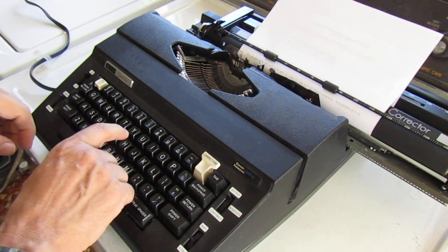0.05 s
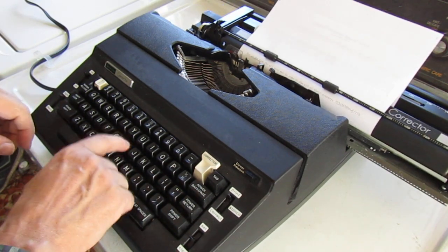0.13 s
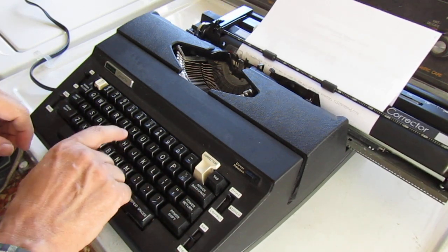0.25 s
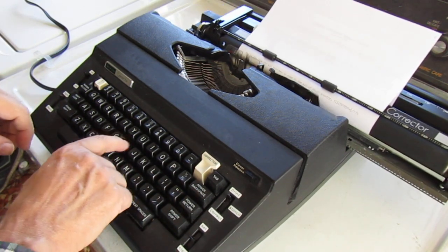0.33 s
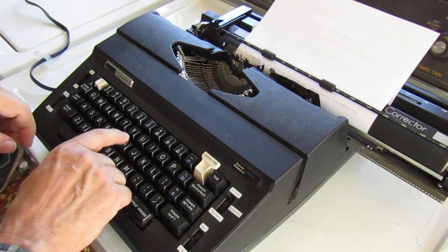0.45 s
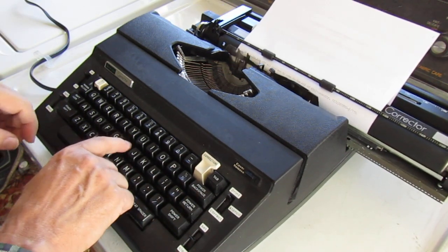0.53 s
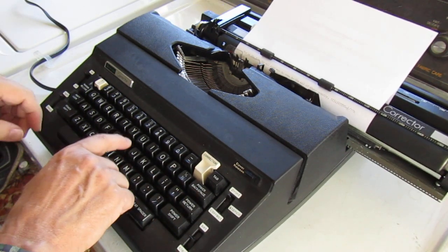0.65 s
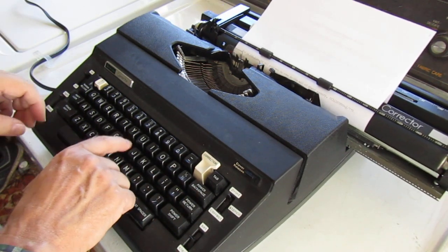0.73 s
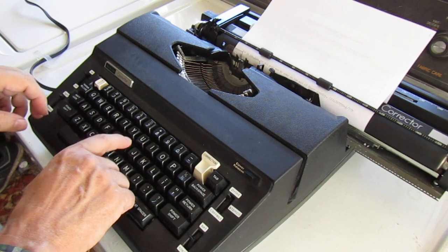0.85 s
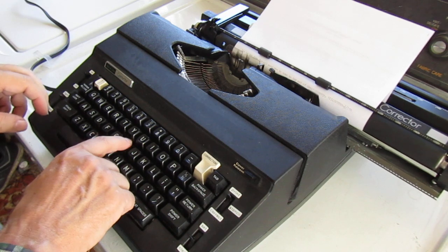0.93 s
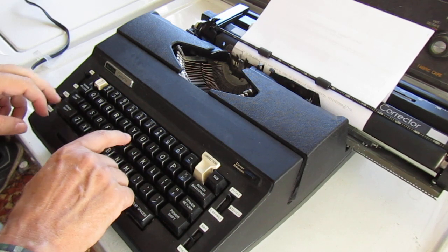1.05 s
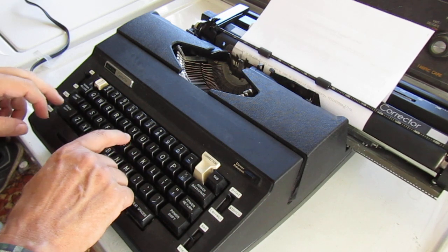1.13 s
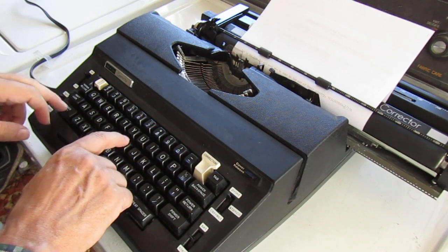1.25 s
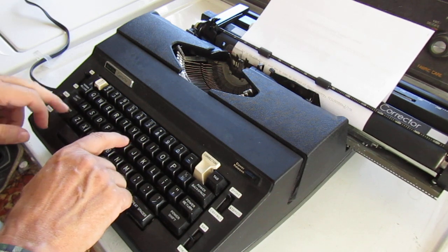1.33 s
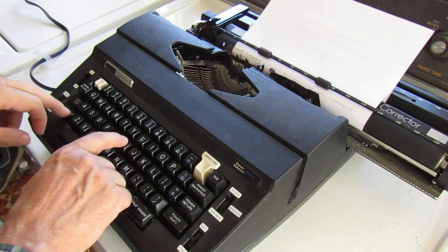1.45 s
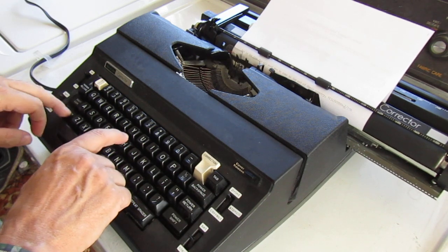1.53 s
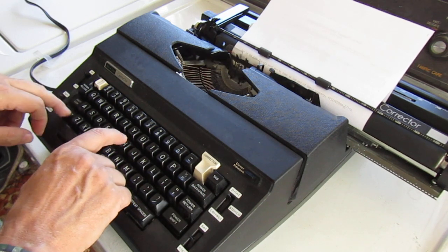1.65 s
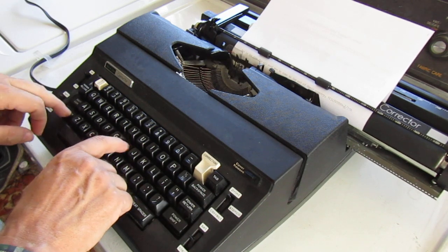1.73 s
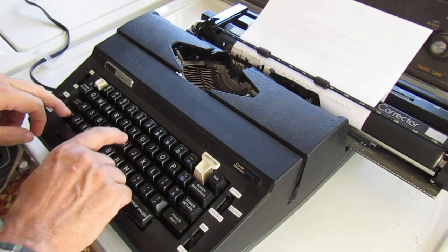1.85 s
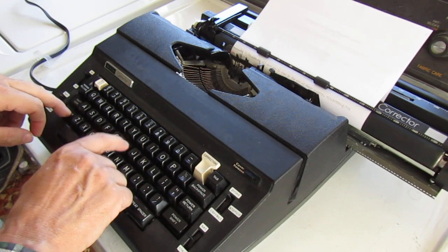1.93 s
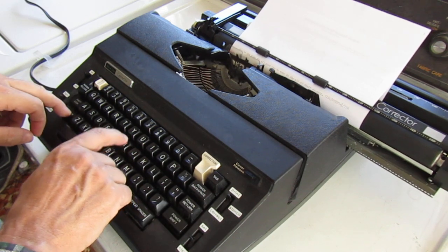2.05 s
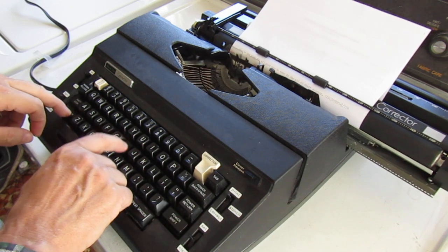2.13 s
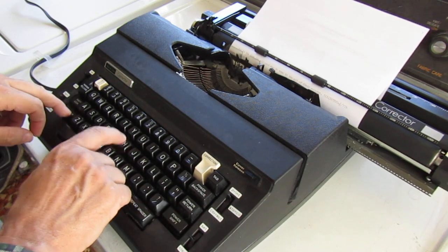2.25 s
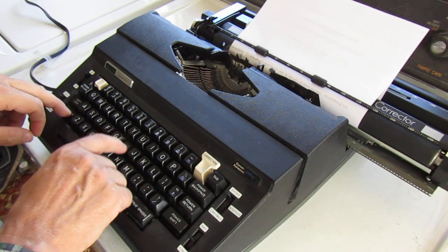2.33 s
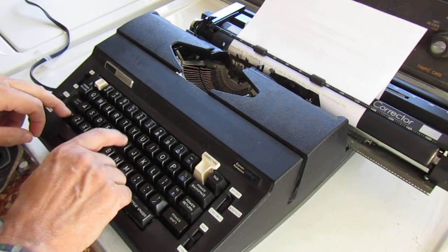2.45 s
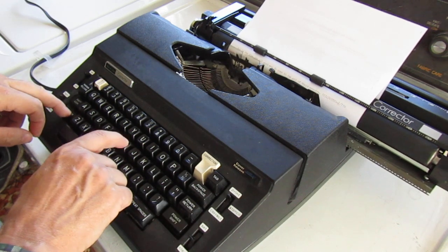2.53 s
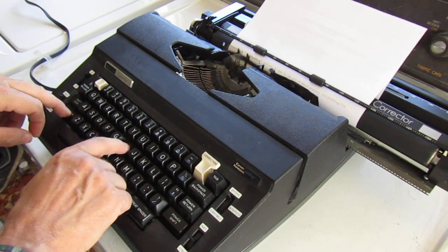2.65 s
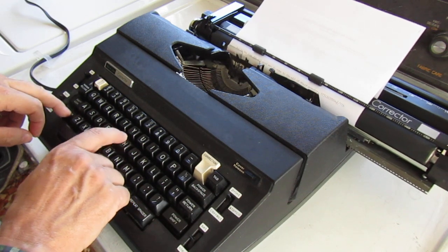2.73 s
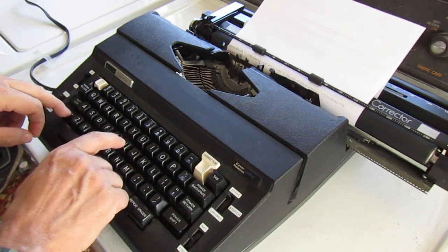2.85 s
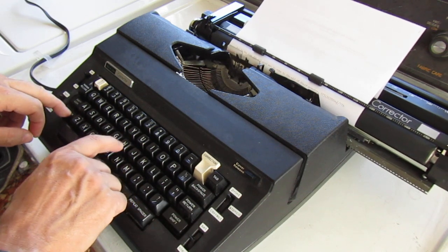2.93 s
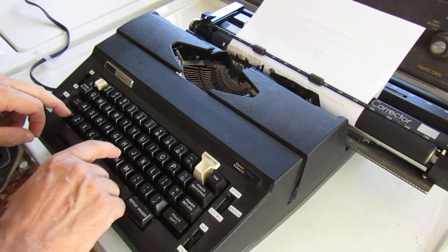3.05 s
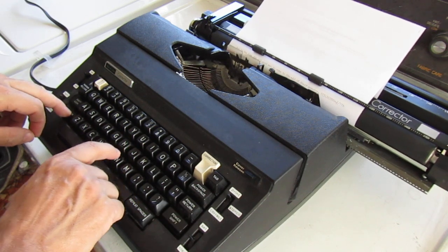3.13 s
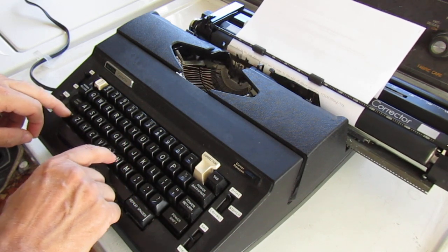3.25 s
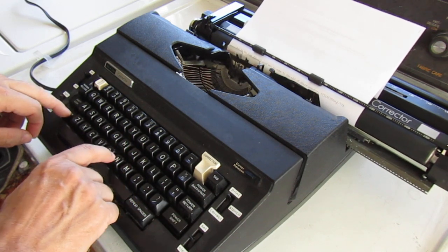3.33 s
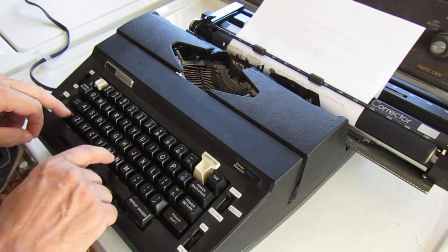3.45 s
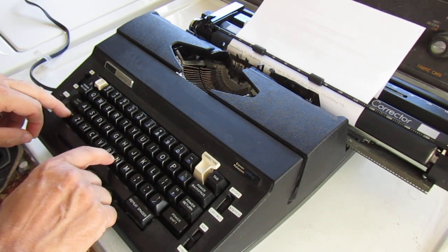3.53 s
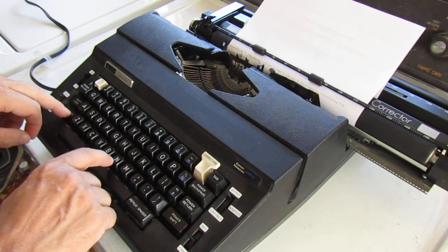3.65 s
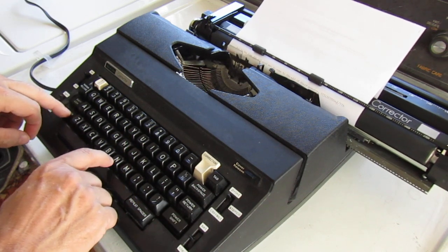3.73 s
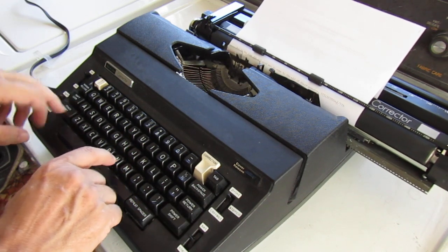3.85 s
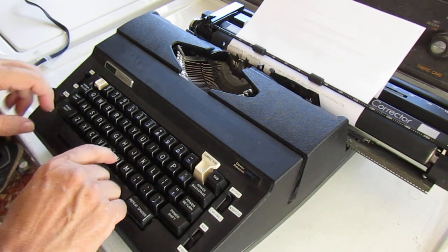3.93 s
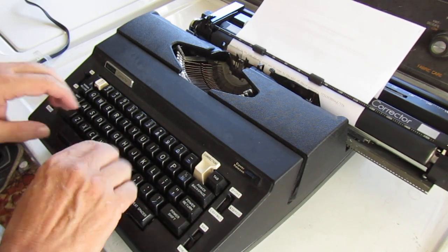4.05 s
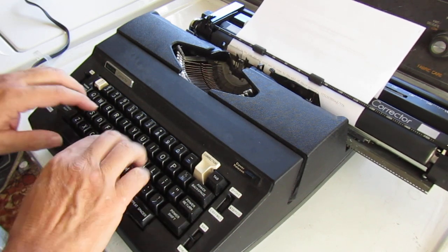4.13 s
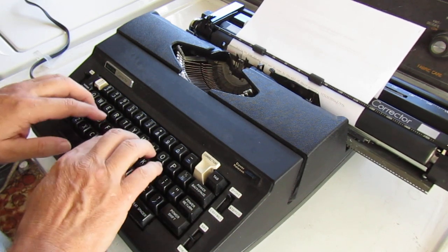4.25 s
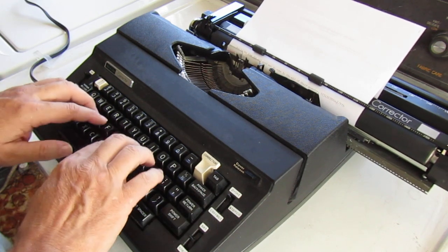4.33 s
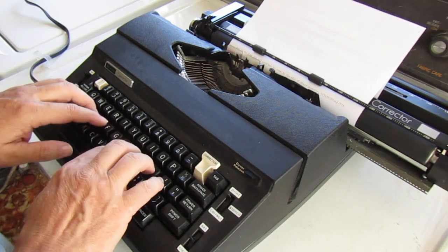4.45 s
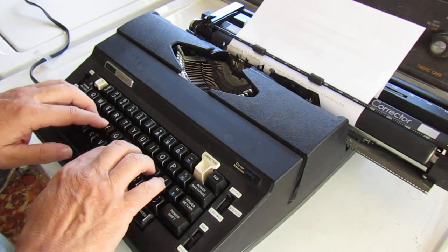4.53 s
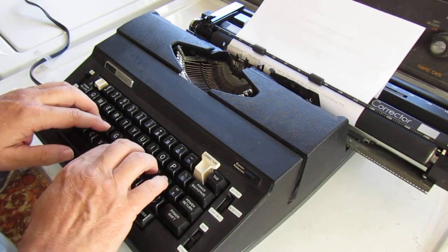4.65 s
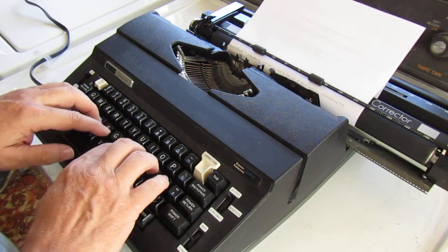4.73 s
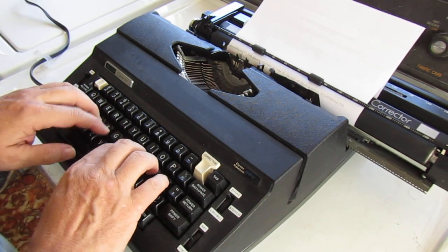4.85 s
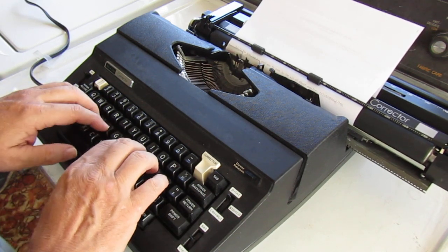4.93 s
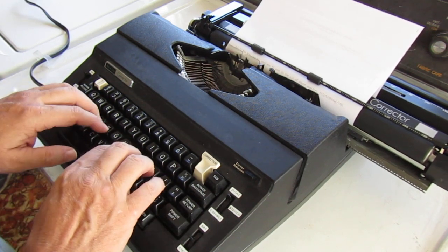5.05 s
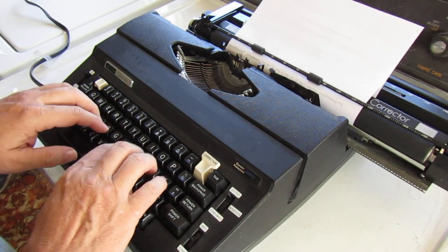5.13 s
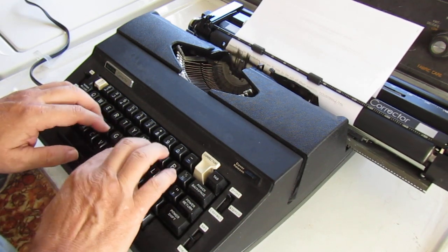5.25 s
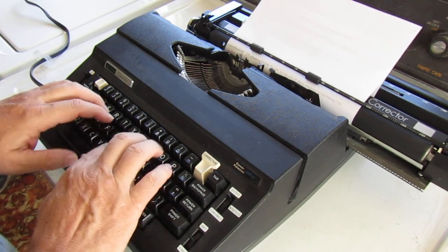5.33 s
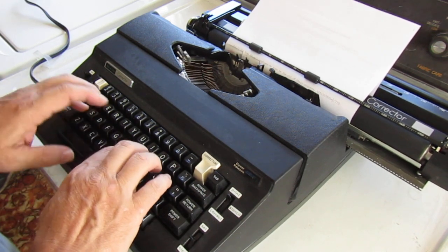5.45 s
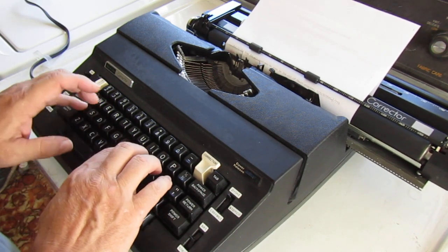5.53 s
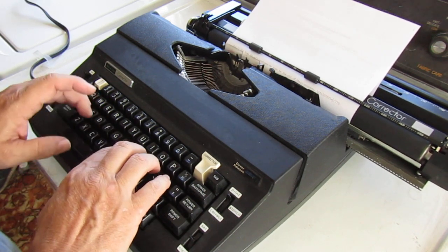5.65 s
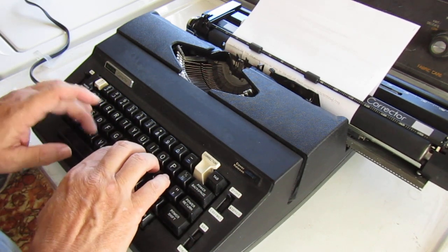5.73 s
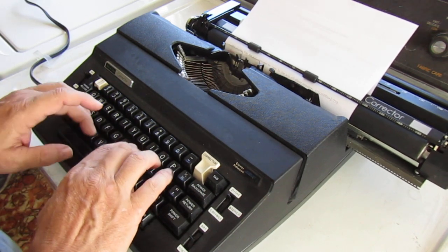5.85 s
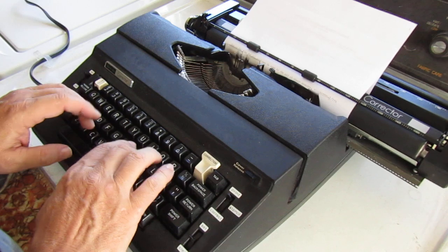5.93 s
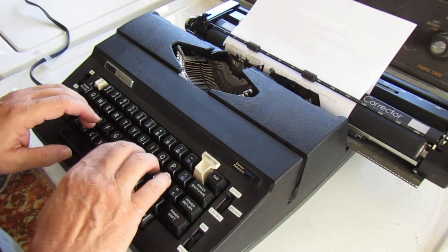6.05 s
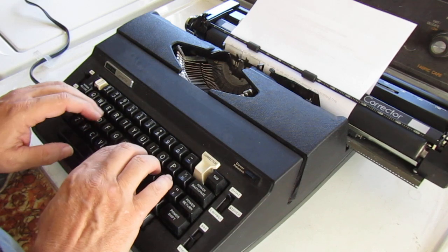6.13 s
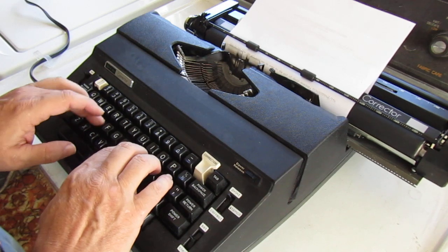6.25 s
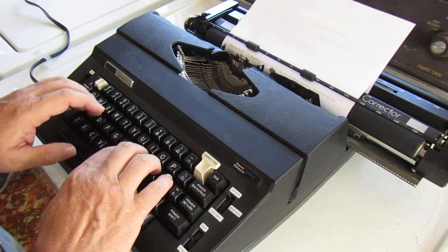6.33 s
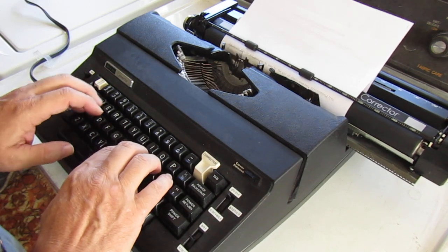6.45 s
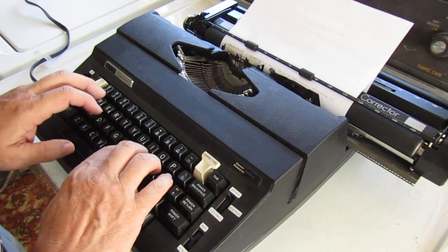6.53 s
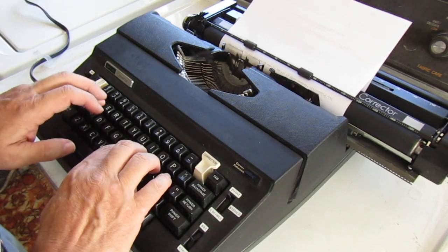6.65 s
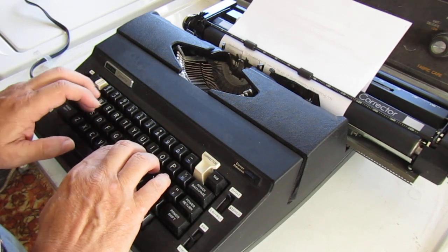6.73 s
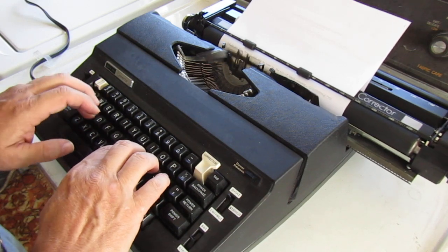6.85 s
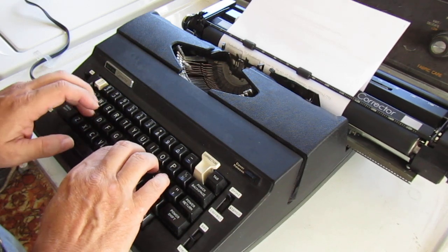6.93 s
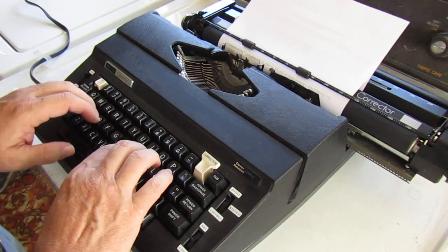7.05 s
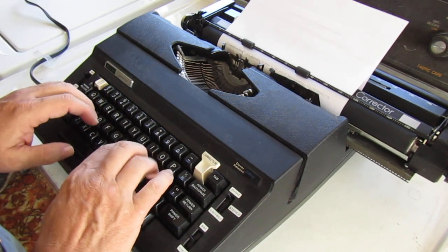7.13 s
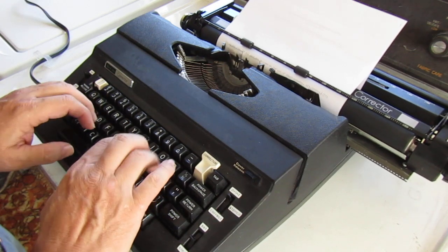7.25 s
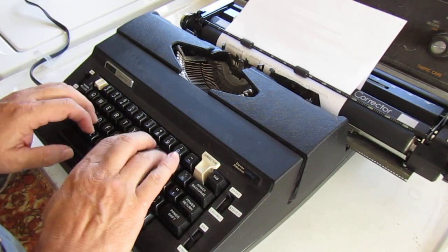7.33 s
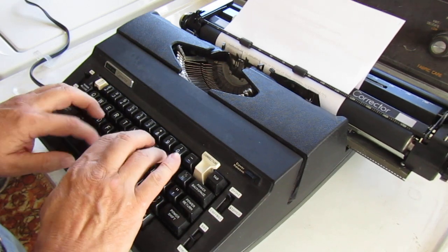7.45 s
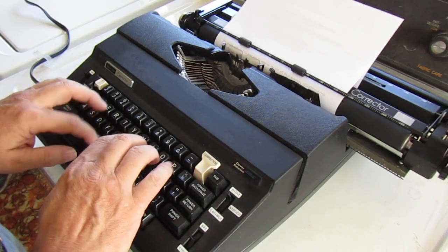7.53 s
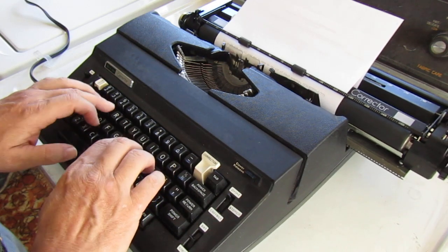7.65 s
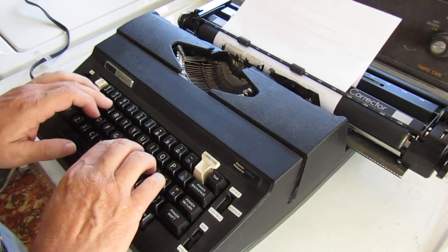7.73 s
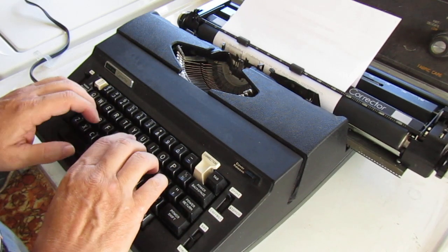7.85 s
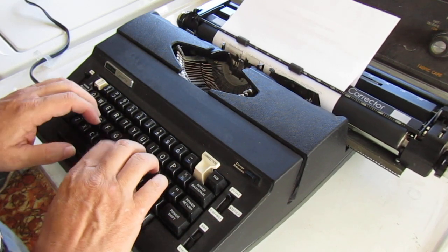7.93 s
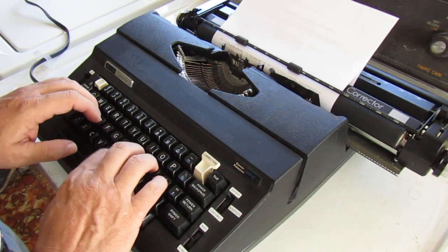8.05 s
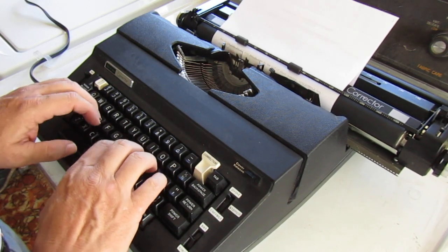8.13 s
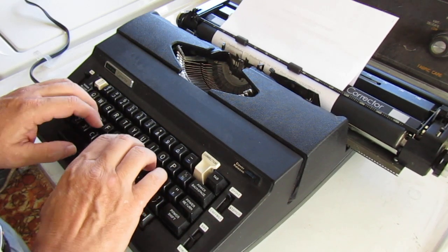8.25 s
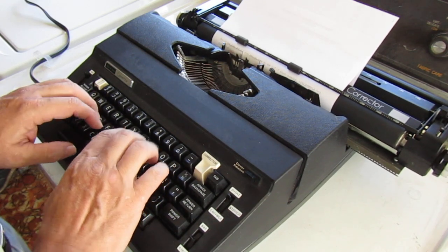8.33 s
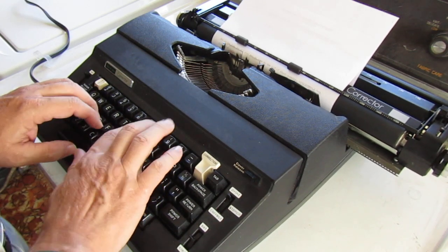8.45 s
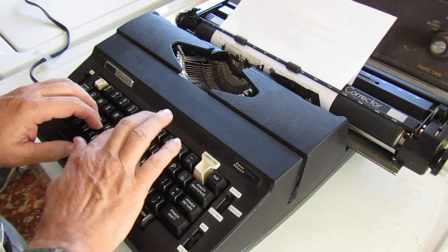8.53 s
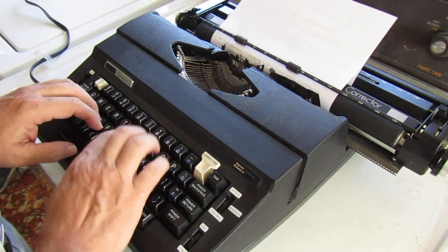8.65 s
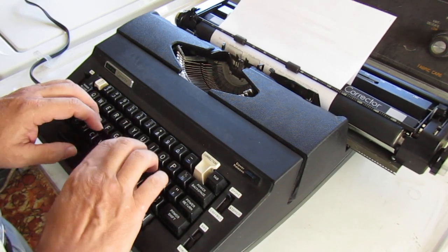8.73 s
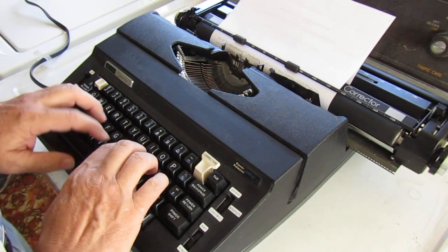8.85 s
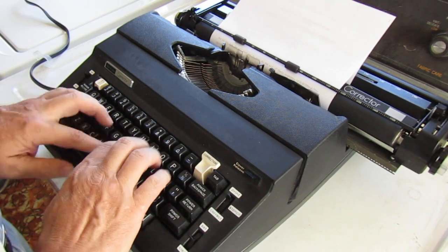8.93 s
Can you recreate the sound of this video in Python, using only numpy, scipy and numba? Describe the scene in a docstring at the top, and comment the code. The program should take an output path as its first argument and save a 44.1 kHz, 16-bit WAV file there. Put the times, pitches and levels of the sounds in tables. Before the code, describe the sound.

An electric typewriter on a table is heard from close by in a small, dry room, its motor giving a steady low hum and faint whirr throughout. From about 0.2 to 1 second, five quick letters strike, each a sharp crack with a bright metallic rattle and a slight thud of the carriage stepping. The shift goes down with a duller clack at 1.4 seconds, and five more letters follow from 1.8 to 2.7 seconds. The hum then carries on alone until the shift releases near 3.9 seconds with a clack and a tiny ping. The space bar knocks at around 5 seconds, and a longer, uneven run of letters goes from 5.3 to 8.5 seconds, some in quick pairs. Softer space bar clacks fall near 7.1, 7.9 and 8.8 seconds, and a light key click comes at about 9 seconds.

```python
"""An electric typewriter on a table, typed on in short runs, miked from close by in a small, dry room.
At each stroke a key trips, a cam catches the power roll, the type bar cracks on the platen, the
carriage steps and the bar drops back. Shift and space bar clack; the motor hums throughout.
Behind the one microphone, gain control ducks at the blows and creeps back in the pauses."""
import sys
import numpy as np
from scipy import signal
from scipy.fft import rfft, irfft
from scipy.io import wavfile
from numba import njit

SR = 44100
rng = np.random.default_rng(int(sys.argv[2]) if len(sys.argv) > 2 else 0)


def wav_record(signal):
    """Record a signal, one row per channel, as 16-bit PCM in the file named by sys.argv[1]."""
    frames = np.transpose(np.atleast_2d(signal))
    bounded = np.clip(frames, -1, 1)
    # unit amplitude maps onto the largest positive 16-bit level
    quanta = np.round(bounded * 32767).astype(np.int16)
    wavfile.write(sys.argv[1], SR, quanta)


N = 396900

# Typed letters. Each row: time of the blow in seconds, its force in dB, the key's lead in seconds.
LETTERS = [(0.224, -1.5, 0.027), (0.4110, -2, 0.025), (0.597, -2, .024), (0.7566, -2, 0.023),
           (0.9694, -1, 0.024), (1.8217, 2, .028), (2.0373, 0, .025), (2.2257, 0, .024), (2.442, 2, .037),
           (2.7097, 1.5, .036), (5.3234, 0, 0.041), (5.4303, -3.5, 0.022), (5.8554, 0, 0.036),
           (5.9603, -1.5, .024), (6.2846, -1.5, 0.035), (6.4658, -3, 0.046), (6.6809, -2.5, 0.039),
           (6.8921, -1.5, 0.031), (7.2382, -3, 0.029), (7.4535, -3.5, 0.03), (7.5564, -1.5, 0.032),
           (7.7434, -0.5, 0.05), (8.059, 0.5, 0.027), (8.5381, -1.5, 0.037)]
# The shift goes down, later up. Each row: key time in seconds, relative clack and thud levels in dB.
SHIFTS = [(1.430, -15, -43.5), (3.920, -17.5, -31)]
# The space bar. Each row: key time in seconds, relative clack and thud levels in dB.
SPACES = [(4.927, -22, -35), (7.069, -23.5, -33), (7.900, -23.5, -45), (8.793, -23.5, -54)]
CAM_LEAD_S, STEP_LAG_S, DROP_LAG_S = .0225, .036, .086  # before and after each blow
SHIFT_TRAVEL_S, SPACE_TRAVEL_S = .036, .072  # from the key to the linkage's stop


def undb(db):
    """Decibels to gain."""
    return 10 ** (np.asarray(db) / 20)


def seconds(length):
    """A time axis."""
    return np.arange(int(length * SR)) / SR


def fade(t, t60):
    """Exponential decay, 60 dB down after t60 seconds."""
    return np.exp(-np.log(1000) * t / t60)


def unit(x):
    """Scale to energy 1."""
    return x / np.sqrt(np.sum(x ** 2))


def add(track, at, sound):
    """Mix a sound in at a time in seconds."""
    i = int(round(at * SR))
    track[i:i + len(sound)] += sound[:max(N - i, 0)]


def convolve(x, response):
    """Pass a sound through an impulse response."""
    return signal.fftconvolve(x, response)[:N]


def tint(x, points, size=4096):
    """Minimum-phase filter through (Hz, dB) points."""
    hz, db = np.transpose(points)
    bins = np.maximum(np.arange(size // 2 + 1) * SR / size, 1)
    gain = undb(np.interp(np.log(bins), np.log(hz), db))
    cepstrum = irfft(np.log(gain))
    cepstrum[1:size // 2] *= 2
    cepstrum[size // 2 + 1:] = 0
    return convolve(x, irfft(np.exp(rfft(cepstrum))))


def walk(rate_hz):
    """Random drift with a spread near 1."""
    knots = rng.standard_normal(2048)
    return np.interp(np.arange(N) / SR * rate_hz, np.arange(len(knots)), knots)


def ring(modes, t, detune=0, scatter_db=0):
    """Damped (Hz, dB, t60) modes, with optional scatter in pitch and level."""
    hz, db, t60 = np.transpose(modes)[:, :, None]
    level_draw, pitch_draw = rng.standard_normal((2, len(modes), 1))
    envelopes = undb(db + scatter_db * level_draw) * fade(t, t60)
    return np.sum(envelopes * np.sin(2 * np.pi * hz * (1 + detune * pitch_draw) * t), axis=0)


def rattle(times, levels_db, t60, grain_db, rise_s):
    """Loose metal chatters: at each time a dying cluster of uneven clicks spreads to nearby parts."""
    track, t = np.zeros(N), seconds(.3)
    power = (fade(t, t60) * (1 - np.exp(-t / rise_s))) ** 2
    neighbours = undb(-2.5) * unit(fade(t, t60=.16))
    spread = np.abs(convolve(power, neighbours ** 2))[:len(t)]
    shape = np.sqrt(power + spread)
    for at, db in zip(times, levels_db):
        noise, grain = rng.standard_normal((2, len(t)))
        clicks = unit(shape * noise * undb(grain_db * grain))
        add(track, at, undb(db) * np.linalg.norm(shape) * clicks)
    return track


def letters():
    """Each letter's time and force, with the bar ring, carriage step and bar drop of its run."""
    # Runs of typing, each with its own keys and stretch of rail. Each row: start in seconds,
    # type bar ring in dB, carriage step and bar drop in dB added to the blow's force.
    runs = [(0, 3, -15, -33), (1.7, -9, -8, -21.5), (5.2, 1.5, -13, -21), (6.2, 6, -8, -20.5)]
    at, db, _ = np.transpose(LETTERS)
    starts, bar_db, step_db, drop_db = np.transpose(runs)
    run = np.searchsorted(starts[1:], at)
    return at, db, bar_db[run], db + step_db[run], db + drop_db[run]


def knocks():
    """Shift and space bar reach their stops. Each row: time in seconds, clack and thud in dB."""
    return ([(at + SHIFT_TRAVEL_S, db, thud_db) for at, db, thud_db in SHIFTS]
            + [(at + SPACE_TRAVEL_S, db, thud_db) for at, db, thud_db in SPACES])


def motor():
    """The bed under the typing: mains hum, wavering belt and roll tones, a faint whine, a whirr."""
    # Motor tones. Each row: pitch in Hz, level in dB, waver in Hz.
    hum_lines = [(57, -67, 1), (120, -55, .1), (131, -49, .25), (184, -58, 2), (223, -58, 1),
                 (240, -46.5, .1), (310, -59, 2), (360, -53.5, .2), (480, -60, .3), (497, -62, 1.5),
                 (543, -63, 1), (600, -64, .3), (11810, -79, 5)]
    # Running noise. Each row: frequency in Hz, relative level in dB.
    whirr_colour = [(25, -26), (55, -13), (95, -8.5), (170, -4.5), (330, -5), (500, -10.5), (800, -15.5),
                    (1500, -21), (3000, -29), (6000, -35), (12000, -40), (15000, -49.5)]
    tones = np.zeros(N)
    for hz, db, waver_hz in hum_lines:
        phase = 2 * np.pi * np.cumsum(hz + waver_hz * walk(9.9)) / SR
        tones += np.sqrt(2) * undb(db) * np.sin(phase)
    whirr = tint(rng.standard_normal(N), whirr_colour) * undb(.8 * walk(25))
    return tones + undb(-44.5) * whirr / np.std(whirr)


def key_clicks():
    """Every letter, shift and space begins with its key's click; letters hit harder after a pause."""
    # Keys brushed or let go between letters. Each row: time in seconds, level in dB.
    touches = [(1.353, -41.5), (2.633, -37.5), (4.881, -31.5), (5.643, -31.5), (7.402, -24), (8.739, -30.5),
               (8.979, -17)]
    key_db, harder_db, pause_s = -22, 3.5, .7
    blow_at, _, lead_s = np.transpose(LETTERS)
    after_pause = np.diff(blow_at, prepend=-np.inf) > pause_s
    clicks = list(zip(blow_at - lead_s, key_db + harder_db * after_pause))
    clicks += [(at, db - 8) for at, db, _ in SHIFTS]
    clicks += [(at, db - 5.5) for at, db, _ in SPACES]
    clicks += [(3.914, -17)]  # the shift lock lets go
    return rattle(*np.transpose(clicks + touches), t60=.069, grain_db=2, rise_s=.00015)


def levers():
    """Keys trip levers; the cam grabs the spinning roll and throws the bar, scraping into its guide."""
    # The levers' bright clatter. Each row: frequency in Hz, gain in dB.
    colour = [(60, -31), (300, 0.5), (900, -10), (1400, -1.5), (2500, -2.5), (4000, -1.5), (5600, 0),
              (7700, -0.5), (9500, 0.5), (11500, -2.5), (15000, -15)]
    at, blow_db, _ = np.transpose(LETTERS)
    keys = key_clicks()
    cams = rattle(at - CAM_LEAD_S, blow_db - 12, t60=.05, grain_db=3, rise_s=.0005)
    scrapes = rattle(at - .005, blow_db - 8, t60=.037, grain_db=1.5, rise_s=.001)
    return tint(keys + cams + scrapes, colour)


def type_bars():
    """The slug hits paper and platen: a short crack, thrown back at the mic by a nearby surface."""
    # Modes of the blow on the platen. Each row: pitch in Hz, relative level in dB, t60 in seconds.
    platen_modes = [(2629, -0.5, 0.0095), (2860, -1, 0.0075), (3792, -0.5, 0.0091), (4165, -1, 0.0073),
                    (6863, 1.5, .002), (8730, -7, 0.006), (9546, -7, 0.006), (11700, -16.5, 0.0023)]
    # The type bar's own short ring, with the same columns.
    bar_modes = [(4807, -0.5, 0.0053), (6046, -4.5, 0.0042)]
    track, t = np.zeros(N), seconds(.02)
    contact = 1 - np.exp(-(t / .00045) ** 2)  # paper and ribbon cushion the first touch
    bass_cut = signal.butter(3, 2200, "highpass", fs=SR, output="sos")  # a small source has little bass
    for at, db, bar_db, _, _ in zip(*letters()):
        platen = ring(platen_modes, t, detune=.0054, scatter_db=1.25)
        bar = undb(bar_db) * ring(bar_modes, t, detune=.0033)
        crack = undb(db + 23.5) * unit(signal.sosfilt(bass_cut, contact * (platen + bar)))
        add(track, at, crack)
        add(track, at + .0041, undb(-10) * np.diff(crack))  # the thinner reflection
    return track


def basket():
    """The blow shakes the neighbouring bars and the ribbon guide."""
    # The shaken metal. Each row: frequency in Hz, gain in dB.
    colour = [(60, -27.5), (200, -23), (380, -14.5), (800, -20.5), (1330, -8), (1650, -13), (2100, -10.5),
              (2500, -6), (3800, -2.5), (5500, -8), (7600, -8.5), (9300, -10), (12000, -16), (15000, -26.5)]
    at, db, _ = np.transpose(LETTERS)
    return tint(rattle(at, db + 13.5, t60=.027, grain_db=6, rise_s=.00067), colour)


def carriage():
    """The escapement lets the carriage jump one place; then the type bar drops onto its rest."""
    # Escapement and bar rest. Each row: frequency in Hz, gain in dB.
    colour = [(60, -21), (300, 5), (850, -6.5), (1300, 1), (2200, 1.5), (4000, -4.5), (5400, 3), (6900, 1),
              (7800, 1), (9400, 0.5), (11500, -6), (15000, -21)]
    at, _, _, step_db, drop_db = letters()
    steps = rattle(at + STEP_LAG_S, step_db + 7, t60=.032, grain_db=3.5, rise_s=.004)
    drops = rattle(at + DROP_LAG_S, drop_db, t60=.041, grain_db=.5, rise_s=.00038)
    return tint(steps + drops, colour)


def shudder():
    """Set moving by a letter, the shift or the space bar, the carriage rumbles on for a moment."""
    # The carriage on its rail. Each row: frequency in Hz, gain in dB.
    colour = [(60, -4.5), (170, 5.5), (310, 9.5), (420, 8), (620, 8.5), (950, 2), (1400, 0.5),
              (2500, -13.5), (6000, -34), (15000, -49)]
    moves = [(at + STEP_LAG_S, -24) for at, _, _ in LETTERS]
    moves += [(at + SPACE_TRAVEL_S / 2, db - 2) for at, db, _ in SPACES]
    moves += [(at + SHIFT_TRAVEL_S / 2, db - 5) for at, db, _ in SHIFTS]
    return tint(rattle(*np.transpose(moves), t60=.41, grain_db=.5, rise_s=.019), colour)


def thuds():
    """Each stop of the heavy carriage rocks the case on the table, more so after a hard step."""
    # Modes of the case on the table. Each row: pitch in Hz, relative level in dB, t60 in seconds.
    case_modes = [(70, 5, 0.15), (81, -1, 0.3), (192.5, -5, 0.41), (323.6, -7.5, 0.69), (500, -14.5, 0.22)]
    track, t = np.zeros(N), seconds(.4)
    swell = 1 - np.exp(-t / .028)
    stops = [(at + STEP_LAG_S, .14 * step_db - 24) for at, _, _, step_db, _ in zip(*letters())]
    stops += [(at, thud_db) for at, _, thud_db in knocks()]
    for at, db in stops:
        add(track, at, undb(db) * swell * ring(case_modes, t, detune=.045, scatter_db=1))
    return track


def linkage():
    """The long levers of shift and space bar clack at their stops, duller than the letter keys."""
    # The long levers' knock. Each row: frequency in Hz, gain in dB.
    colour = [(60, 0.5), (300, 7), (500, 2.5), (850, -2), (1400, 3), (2200, 1), (3500, -3.5), (5400, -4),
              (7800, -8.5), (9400, -7.5), (15000, -23.5)]
    clacks = [(at, db + .5) for at, db, _ in knocks()]
    clacks += [(at, db - 1) for at, db, _ in SPACES]  # the space bar also clacks going down
    clacks += [(at + SPACE_TRAVEL_S + .035, db - 7) for at, db, _ in SPACES]  # and springing back
    return tint(rattle(*np.transpose(clacks), t60=.12, grain_db=2.5, rise_s=.0015), colour)


def shift_latch():
    """The shift latch springs free and pings once."""
    # Modes of the spring catch. Each row: pitch in Hz, relative level in dB, t60 in seconds.
    catch_modes = [(4690, -13, 0.058), (4840, -5, 0.051), (5380, -7, 0.045), (7045, -5.5, 0.046),
                   (7940, 0.5, 0.04)]
    track = np.zeros(N)
    add(track, 3.922, undb(-15.5) * ring(catch_modes, seconds(.2)))
    return track


def shade_treble(clatter):
    """The clatter is brighter in the early runs, duller in the later ones."""
    # The treble's course. Each row: time in seconds, gain in dB.
    treble_curve = [(2.8, 2.5), (5.2, -0.5)]
    treble = signal.sosfiltfilt(signal.butter(2, 6500, "highpass", fs=SR, output="sos"), clatter)
    gain = undb(np.interp(np.arange(N) / SR, *np.transpose(treble_curve)))
    return clatter + (gain - 1) * treble


def frame_and_room(clatter):
    """The clatter rings the steel frame and dies away in the room; this close, direct sound leads."""
    # Modes of frame, bars and springs. Each row: pitch in Hz, relative level in dB.
    frame_modes = [(1310, 6), (2470, -12), (2842, 3.5), (3105, 5), (3570, 4), (3782, 0.5), (4058, 0.5),
                   (4178, 1.5), (4372, -21.5), (4738, 3), (5520, -5.5), (6200, 0), (6930, 0.5), (7112, 4.5),
                   (8392, 4.5), (9290, -5), (9620, 9.5)]
    frame_t60_s, room_t60_s = .11, .26
    t = seconds(.5)
    steel = unit(ring([(hz, db, frame_t60_s) for hz, db in frame_modes], t))
    decay = fade(t, room_t60_s) * (1 - np.exp(-t / .001))
    echoes = rfft(rng.standard_normal(len(t)) * decay)
    walls = unit(irfft(echoes / np.abs(echoes)) * np.sqrt(decay))  # reflections that favour no pitch
    return clatter + convolve(clatter, undb(-19) * steel + undb(-9.5) * walls)


def scene():
    """The whole machine from beside the table, in mono."""
    clatter = shade_treble(basket() + levers() + shift_latch() + carriage() + linkage())
    return (type_bars() + frame_and_room(clatter) + shudder() + thuds() + motor())[None]


@njit
def follow(size, rest, attack, release):
    """Level detector: climbs quickly, sinks slowly, never below its resting value."""
    out, level = np.empty(len(size)), rest
    for i in range(len(size)):
        if size[i] > level:
            level += (size[i] - level) * attack
        else:
            level = max(level * release, rest)
        out[i] = level
    return out


def record(dry):
    """After the microphone, gain control ducks and recovers slowly; first peaks clip; the top is cut."""
    threshold, attack_s, recovery_db_per_s, top_hz = undb(-13), .004, 4.5, 15200
    mic = signal.lfilter(*signal.iirnotch(7830, Q=39, fs=SR), dry)  # its one narrow dip in the treble
    release = float(undb(-recovery_db_per_s / SR))
    level = follow(np.abs(mic[0]), float(threshold), 1 / (attack_s * SR), release)
    clipped = np.clip(mic * threshold / level, -.93, .93)
    return signal.sosfilt(signal.ellip(10, .2, 90, top_hz, fs=SR, output="sos"), clipped)


dry = scene()
out = record(dry)
wav_record(out)
```